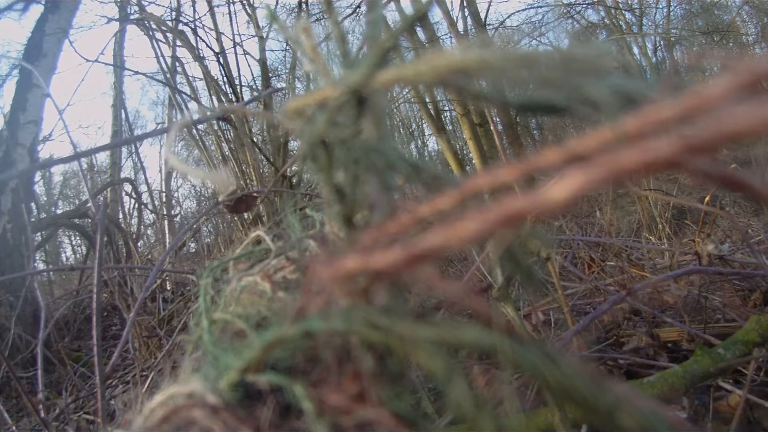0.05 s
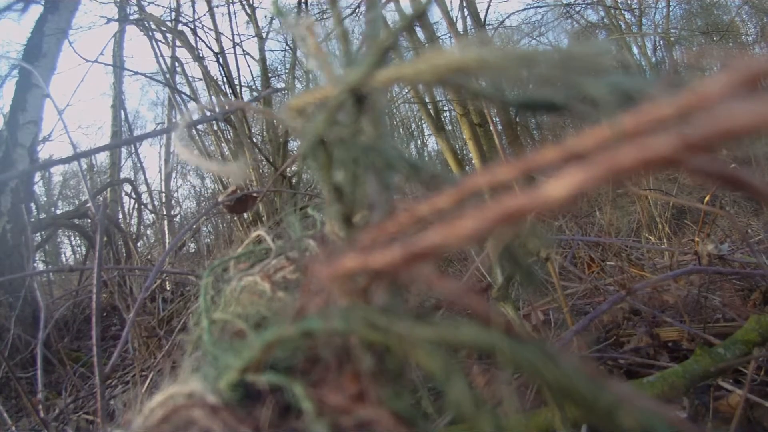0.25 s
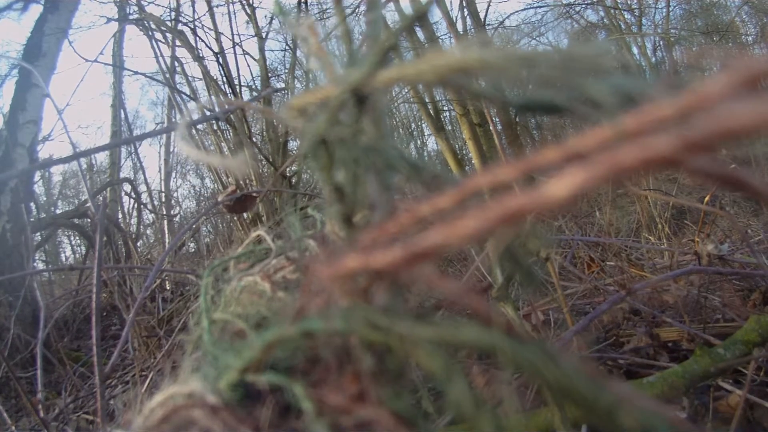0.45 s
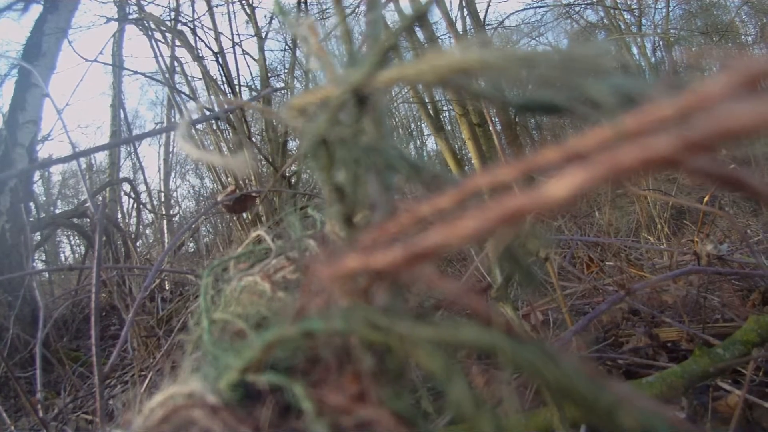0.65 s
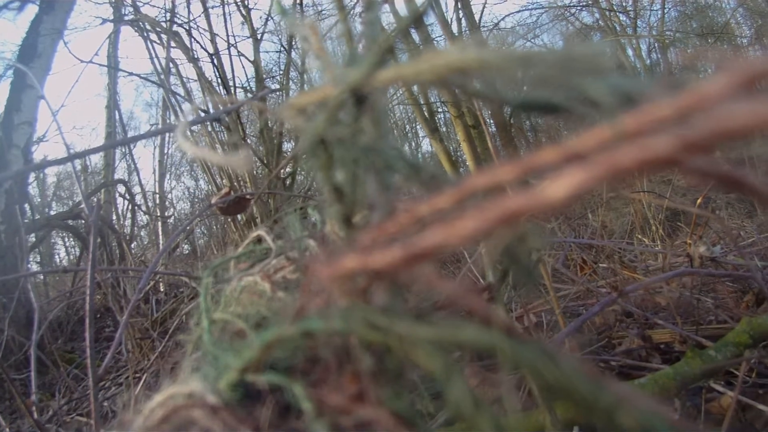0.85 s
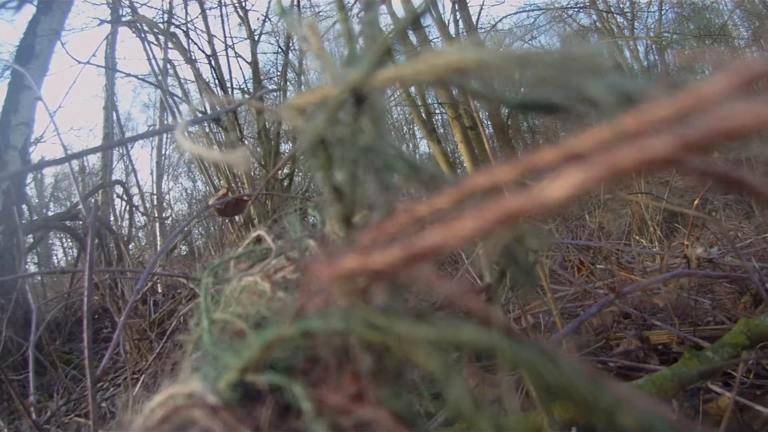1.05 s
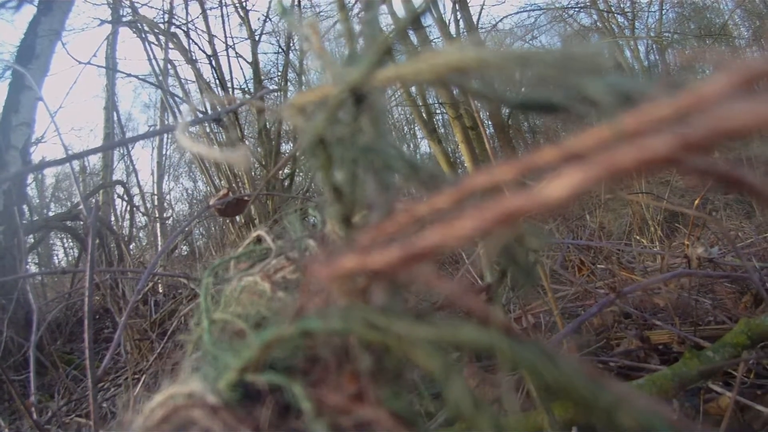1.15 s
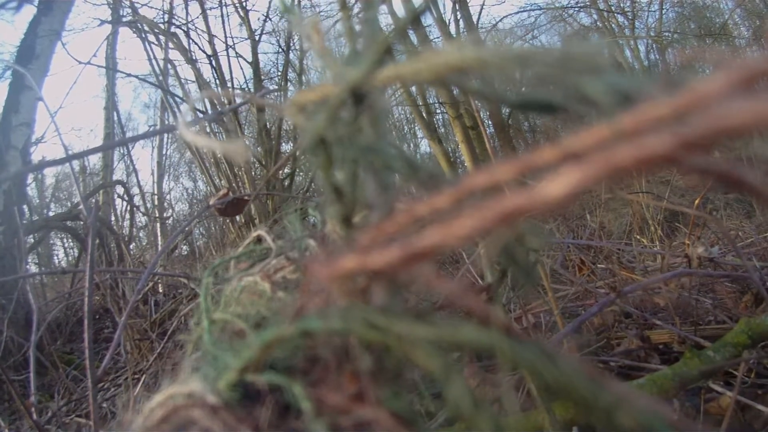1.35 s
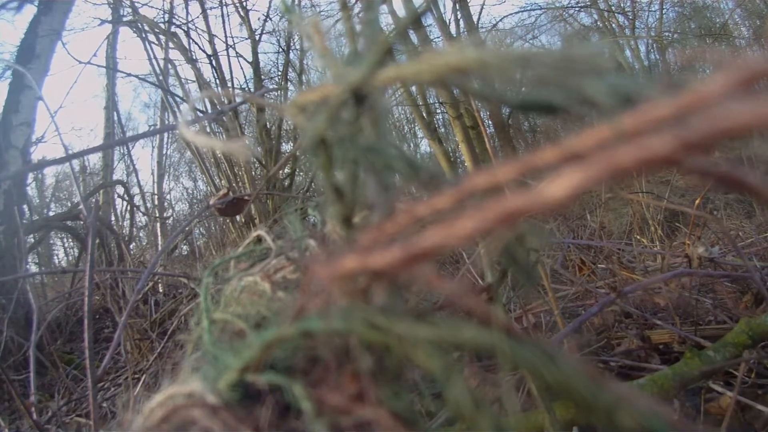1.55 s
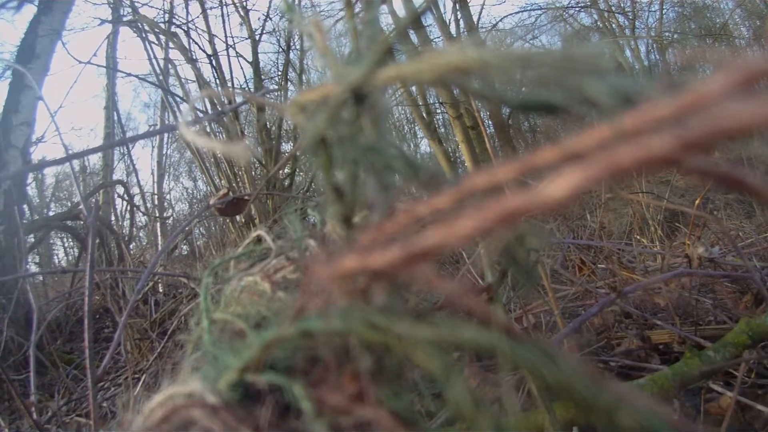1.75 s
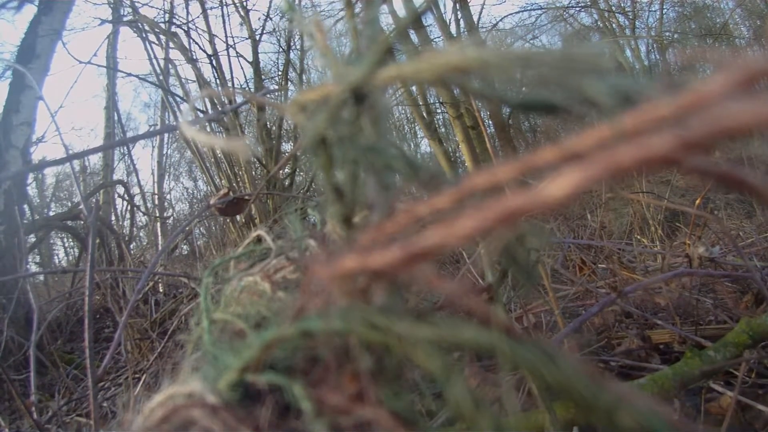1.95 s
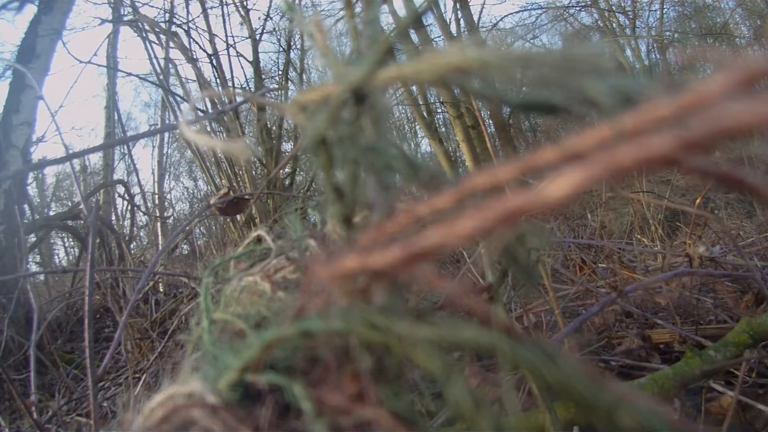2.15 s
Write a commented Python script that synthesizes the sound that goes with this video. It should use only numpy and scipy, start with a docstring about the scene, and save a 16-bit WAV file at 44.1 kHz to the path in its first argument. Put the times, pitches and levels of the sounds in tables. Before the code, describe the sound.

An electric airsoft gun fires two sharp, whirring shots close by in a quiet wood.

```python
"""In a wood, an electric airsoft gun fires twice right beside the microphone. Each time the motor kicks
in, the gears whine up and draw the piston back against a spring. The piston shrieks forward and slams,
overloading the microphone, and the gears run down; then the trigger clacks back. Dry leaves rustle,
twigs snap and the trees return a faint echo."""
import sys
import numpy as np
from scipy import signal
from scipy.fft import rfft, irfft
from scipy.io import wavfile
from scipy.ndimage import map_coordinates

SR = 44100
rng = np.random.default_rng(int(sys.argv[2]) if len(sys.argv) > 2 else 0)


def to_wav(s):
    """Save 16-bit WAV."""
    ch = np.atleast_2d(s).T  # columns
    pcm = np.round(np.clip(ch, -1, 1) * 32767)  # PCM
    wavfile.write(sys.argv[1], SR, pcm.astype(np.int16))


N = 97020

# the two shots (motor starts [s], piston let go [s], piston hits [s], time under power [s])
SHOTS = [(.1892, .2724, .2800, .130), (1.2772, 1.3568, 1.3645, .125)]
# tone of hard parts knocking or scraping (frequency [Hz], level [dB])
KNOCK_TONE = [(40, -29), (100, -21), (250, -0.5), (550, -13), (1000, -1), (2000, -1.5), (3200, -0.5),
              (6000, 1.5), (7500, -4), (10000, -9), (15000, -26.5)]
STOCK_HZ = 248.3  # pitch of the stock, the gun's hollow back end


def amp(db):
    """Turn decibels into a number to multiply by."""
    return 10 ** (np.asarray(db) / 20)


def since(start):
    """Seconds gone by since start, zero before it."""
    return np.maximum(np.arange(N) / SR - start, 0)


def strike(start, t60, attack=0.0007):
    """Loudness of a blow: a quick rise, then a fade of 60 dB in t60 seconds (the fade time)."""
    t = since(start)
    return (1 - np.exp(-t / attack)) * amp(-60 * t / t60)


def ring(start, hz, t60):
    """One fading tone of something struck."""
    return strike(start, t60) * np.sin(2 * np.pi * hz * since(start))


def wobble(rate):
    """A smooth curve through rate random values a second."""
    return map_coordinates(rng.standard_normal(N), [np.arange(N) * rate / SR], mode='nearest')


def colour(x, tone, size=4096):
    """Filter x by a tone table (frequency [Hz], level [dB])."""
    hz, db = np.transpose(tone)
    gain = amp(np.interp(np.log(np.fft.rfftfreq(size, 1 / SR) + 1), np.log(hz + 1), db))
    cepstrum = irfft(np.log(gain + 1e-6))
    # folding this in half makes the filter ring only after a sound, never before
    cepstrum[1:size // 2] *= 2
    cepstrum[size // 2 + 1:] = 0
    return signal.fftconvolve(x, irfft(np.exp(rfft(cepstrum))))[:N]


def noise(tone):
    """Noise shaped by a tone table, then scaled to an average strength (rms) of 1."""
    x = colour(rng.standard_normal(N), tone)
    return x / np.sqrt(np.mean(x ** 2) + 1e-20)


def lowpass(x, hz, order):
    """Dull x above hz; a higher order cuts more sharply."""
    return signal.sosfilt(signal.butter(order, hz, fs=SR, output='sos'), x)


def still_air():
    """The soft hush of the wood, a little different in the left and right ear."""
    # air that both ears share (frequency [Hz], level [dB])
    shared_tone = [(15, -28.5), (25, -1.5), (71, -6), (257, -11), (673, -14), (811, -9.5), (879, -11.5),
                   (1180, -13), (1350, -10.5), (1670, -15), (1810, -12.5), (6540, -19), (15000, -25.5)]
    # air that differs between the ears (frequency [Hz], level [dB])
    side_tone = [(15, -35), (25, 1), (81, 1), (354, -13.5), (1280, -20.5), (2180, -31.5), (6540, -23),
                 (15000, -19)]
    shared = amp(-54.5) * noise(shared_tone)
    side = amp(-61.5) * noise(side_tone)
    return np.array([shared + side, shared - side])


def lingering_hiss():
    """The wood still hisses from a shot just before, and slowly goes quiet."""
    # the fading hiss (frequency [Hz], level [dB])
    hiss_tone = [(300, -27), (1000, -5.5), (2800, -8.5), (4500, 2), (6000, 4), (7200, -7.5), (9500, -22.5),
                 (15000, -29.5)]
    return amp(-43.5 - 21.5 * since(0)) * noise(hiss_tone)


def tree_echo(sound):
    """Countless trunks and twigs scatter the sound's energy into a weak, blurred tail."""
    # the trees' answer (frequency [Hz], level [dB])
    echo_tone = [(100, -11.5), (400, -14), (1000, -8.5), (3000, -1.5), (4800, -1.5), (6000, 5),
                 (7000, -3.5), (9000, -13), (15000, -33.5)]
    fade = strike(0, t60=.9, attack=.01) ** 2
    energy = np.abs(signal.fftconvolve(sound ** 2, fade / fade.sum())[:N])
    return amp(-34 + wobble(50)) * np.sqrt(energy) * noise(echo_tone)


def leaves():
    """Dry leaves swish and settle with a fluttering hiss."""
    # each swish (time [s], level [dB], rise [s], fall [dB per s])
    swishes = [(.722, -35.5, .035, 60)]
    # rustling leaves (frequency [Hz], level [dB])
    leaf_tone = [(290, -61), (500, -34.5), (679, -16.5), (976, -25.5), (1050, -19), (1780, -4.5),
                 (3060, -4.5), (4790, 0.5), (6880, -7.5), (9090, -23.5), (14000, -37.5)]
    motion = sum(amp(db - fall * since(start + rise)) * np.sqrt(np.minimum(since(start) / rise, 1))
                 for start, db, rise, fall in swishes)
    flutter = amp(1.1 * wobble(60) + 1.246 * wobble(600))
    return motion * flutter * noise(leaf_tone)


def twigs():
    """Twigs break with short dry snaps, each with a ping at its own pitch."""
    # each snap (time [s], level [dB], pitch [Hz], fade time [s])
    snaps = [(0.0742, -26.5, 4760, .03), (0.152, -35, 3450, 0.05), (0.4745, -17.5, 4500, 0.0086),
             (.6765, -41.5, 4500, 0.13), (0.7228, -33.5, 4820, 0.031), (0.8412, -34.5, 2200, 0.014),
             (.975, -35, 4500, 0.017), (1.2212, -41, 5100, 0.011), (1.2451, -32, 3250, 0.034),
             (1.2522, -33.5, 4300, 0.06), (1.7185, -37.5, 1650, 0.03), (1.8485, -34.5, 3760, 0.029),
             (1.8667, -34, 4420, 0.017), (1.8762, -39, 4550, 0.024), (1.888, -43.5, 4130, 0.061),
             (1.9141, -43, 3500, 0.017)]
    width = 2 ** 0.58  # 0.58 octaves either side of the pitch
    out = np.zeros(N)
    for start, db, hz, t60 in snaps:
        tone = [(hz / 8, -24), (hz / width, -6), (hz, 0), (hz * width, -10), (hz * 2, -24), (hz * 4, -34)]
        crack = strike(start, t60) * noise(tone)
        out += amp(db) * (crack + amp(-13.5) * ring(start, hz, t60))
    return out


def metal_pings():
    """Small metal parts ring with thin, slightly unsteady tones."""
    # each ping (time [s], level [dB], pitch [Hz], fade time [s], rise [s])
    pings = [(.0735, -29.5, 3580, 0.031, 0.0007), (.4748, -21.5, 4540, 0.011, .0003),
             (1.61, -44.5, 2750, 0.45, .02), (1.61, -48, 2423, .4, 0.022),
             (1.847, -48.5, 1080, 0.25, 0.0014), (1.945, -51, 5180, 0.25, 0.0051)]
    return sum(amp(db) * strike(start, t60, rise) * np.sin(2 * np.pi * hz * since(start) + wobble(120))
               for start, db, hz, t60, rise in pings)


def spring():
    """The released spring sings on faintly once the piston hits."""
    # the spring's overtones (multiple of the base pitch, relative level [dB])
    overtones = [(2, 4), (3, 3.5), (4, -9), (5, -0.5), (6, -1.5)]
    base_hz = 382
    return sum(amp(-59 + db) * ring(hit, multiple * base_hz, t60=1.2)
               for _, _, hit, _ in SHOTS for multiple, db in overtones)


def trigger():
    """The plastic trigger clacks back and thumps the stock; just after, the gears' latch knocks."""
    # trigger and finger letting go (time [s], level [dB], fade time [s], dull above [Hz], thump [dB])
    clacks = [(0.3967, -11, 0.047, 8840, -55), (0.3982, 5, 0.019, 9400, -39),
              (0.4068, -16.5, 0.094, 7050, -20.5), (0.4251, -13.5, 0.015, 6400, -63),
              (1.4595, -16.5, 0.018, 6000, -44), (1.4633, -7, 0.034, 5350, -25.5),
              (1.4721, -16, 0.02, 5400, -56)]
    # clacking plastic (frequency [Hz], level [dB])
    clack_tone = [(40, -41.5), (130, -43), (260, -11), (400, -8.5), (650, -30), (1300, -10), (1950, -0.5),
                  (2500, -7.5), (3000, -2.5), (4300, -4.5), (5500, 3), (7500, -7.5), (10000, -8.5),
                  (15000, -24.5)]
    # dull knock of the latch that stops the gears turning backwards (frequency [Hz], level [dB])
    latch_tone = [(40, -28), (200, 2.5), (400, -13), (750, 1.5), (1200, -6), (3000, -32)]
    # ringing of the trigger lever (pitch [Hz], relative level [dB], fade time [s])
    lever_notes = [(1974, -10.5, 0.022), (2987, -9.5, 0.028), (5420, -20, 0.035)]
    latch_lag_s = 0.0077
    out = np.zeros(N)
    for start, db, t60, dull_hz, thump_db in clacks:
        clack = lowpass(strike(start, t60, attack=0.00049) * noise(clack_tone), dull_hz, order=2)
        latch = amp(-25) * strike(start + latch_lag_s, t60=0.056, attack=0.00071) * noise(latch_tone)
        lever = sum(amp(note_db) * ring(start, hz, fade) for hz, note_db, fade in lever_notes)
        thump = amp(thump_db) * ring(start, STOCK_HZ, t60=0.1)
        out += amp(db) * (clack + lever + latch) + thump
    return out


def shell(sound):
    """The gearbox shell and stock add their own ringing to the sound inside them."""
    # notes of the shell and stock (pitch [Hz], relative energy [dB], fade time [s])
    notes = [(455.4, -24.5, .05), (942, -3.5, .09), (2031, -11, 0.036), (3210, -7, 0.018), (3922, 2, 0.047),
             (4500, -6.5, 0.12), (5653, 6, 0.045), (6190, 0, 0.033)]
    ringing = sum(amp(db) * np.sqrt(1 / t60) * ring(0, hz, t60) for hz, db, t60 in notes)
    ringing /= np.linalg.norm(ringing)
    return sound + amp(-14.5) * signal.fftconvolve(sound, ringing)[:N]


def gears():
    """Gear teeth meet faster and faster, grind against the spring, then coast to a stop."""
    # the gearbox (frequency [Hz], level [dB])
    gear_tone = [(40, -45.5), (150, -34), (250, -10.5), (430, -17), (630, -16.5), (890, -5), (1150, -7.5),
                 (1450, -12.5), (1680, -9.5), (2020, -3), (2600, -7.5), (3800, -3), (4500, -0.5),
                 (5000, -11.5), (5780, 1), (6500, -3.5), (8200, -14), (11000, -23.5), (15000, -30)]
    start_hz, top_hz = 647.2, 1580  # teeth meeting per second
    spin_up_s, slow_down_s, whine_rise_s = .036, 0.041, 0.056
    slack_db, take_up_s, run_down_db_per_s = -11.5, 0.033, 435
    out = np.zeros(N)
    for start, release, _, powered_s in SHOTS:
        t, coasting = since(start), since(start + powered_s)
        tooth_hz = top_hz + (start_hz - top_hz) * np.exp(-(t / spin_up_s) ** 2)
        tooth_hz *= np.exp(-coasting / slow_down_s)
        teeth_passed = np.cumsum(tooth_hz * (1 + .015 * wobble(300))) / SR
        # one click per tooth, each of a slightly different strength
        clicks = np.diff(np.floor(teeth_passed), prepend=0) * amp(2.5 * rng.standard_normal(N))
        clatter = colour(clicks, gear_tone)
        clatter /= np.std(clatter[(t > 0) & (coasting == 0)])
        grind = noise(gear_tone) * amp(1.5 * wobble(350))
        whine_swell = (since(release) == 0) * np.minimum(t / whine_rise_s, 1)
        whine = whine_swell * amp(0.95 * wobble(200)) * np.sqrt(2) * np.sin(2 * np.pi * teeth_passed)
        slack = np.maximum(1 - t / take_up_s, 0)  # the gears are quiet until they meet the spring
        loudness = (t > 0) * amp(slack_db * slack - run_down_db_per_s * coasting)
        out += loudness * (amp(-20) * clatter + amp(-15) * grind + amp(-22.5) * whine)
    return out


def knocks():
    """Hard parts hit each other inside the gearbox; each blow also thumps the stock."""
    # motor kick, gears slipping off, piston slam, bounces
    # (time [s], level [dB], fade time [s], thump [dB])
    blows = [(0.1896, -10.5, 0.022, -29), (0.265, -4.5, 0.038, -30), (0.2796, 5, 0.026, -36),
             (0.2907, -9, 0.035, -43), (0.3037, -7.5, 0.01, -27.5), (0.3145, -8.5, 0.028, -55),
             (0.3187, -5, 0.025, -50.5), (1.2764, -9, 0.023, -27), (1.3522, -3.5, 0.023, -19),
             (1.3648, 4, 0.027, -27), (1.3762, -11.5, 0.02, -45), (1.3896, -7.5, 0.039, -22),
             (1.4, -10, 0.026, -46)]
    out = np.zeros(N)
    for start, db, t60, thump_db in blows:
        out += amp(db) * strike(start, t60) * noise(KNOCK_TONE)
        out += amp(thump_db) * ring(start, STOCK_HZ, t60=.055)
    return out


def piston():
    """The spring lets go and jolts the gun; the piston shrieks down its tube and the air pops out."""
    # the gun's body shaken by the spring (frequency [Hz], level [dB])
    jolt_tone = [(25, -14.5), (90, 6.5), (140, -2.5), (260, 6), (450, 2.5), (900, -14), (2500, -42)]
    shriek_hz, kick_lead_s = 5850, .007
    out = np.zeros(N)
    for _, release, hit, _ in SHOTS:
        sliding = (1 - np.exp(-since(release) / 0.00032)) * np.exp(-since(hit) / .0018)
        flutter = amp(4.9 * wobble(400))
        wavering_hz = shriek_hz * (1 + 0.045 * wobble(600))
        shriek = amp(7) * flutter * np.sin(2 * np.pi * np.cumsum(wavering_hz) / SR)
        kick = release - kick_lead_s
        recoil = amp(-23.5) * ring(kick, hz=87.4, t60=0.12)
        jolt = amp(-23.5) * strike(kick, t60=0.072, attack=0.0024) * noise(jolt_tone)
        scrape = amp(-9) * noise(KNOCK_TONE)
        pop = amp(15) * ring(hit, hz=1069, t60=0.0074)
        out += sliding * (shriek + scrape) + pop + recoil + jolt
    return out


def scene():
    """The gun and the wood sound the same in both ears; only the still air differs."""
    near = shell(gears() + knocks()) + piston() + spring() + trigger() + twigs() + metal_pings()
    return near + lingering_hiss() + tree_echo(near) + leaves() + still_air()


def record(dry):
    """The microphone loses the deepest bass and highest treble, and the shots overload it."""
    low_cut = signal.butter(2, 36, 'highpass', fs=SR, output='sos')
    heard = signal.sosfilt(low_cut, lowpass(dry, hz=15300, order=16))
    ceiling = 1.3
    squashed = heard / (1 + np.abs(heard / ceiling) ** 8) ** (1 / 8)  # rounds off the loudest peaks
    return lowpass(squashed, hz=17000, order=16)


dry = scene()
out = record(dry)
to_wav(out)
```